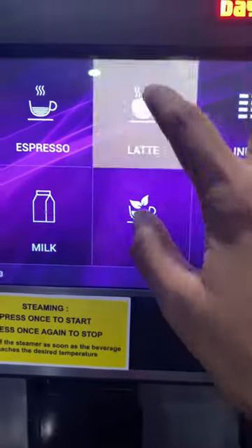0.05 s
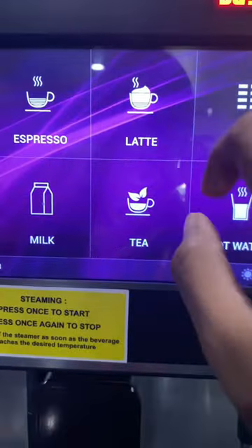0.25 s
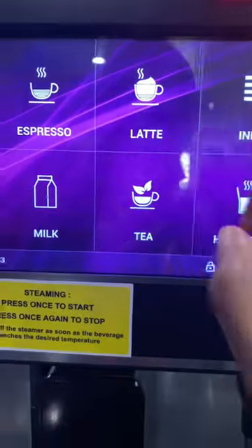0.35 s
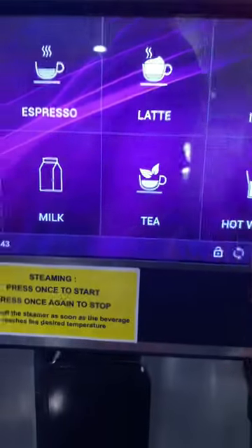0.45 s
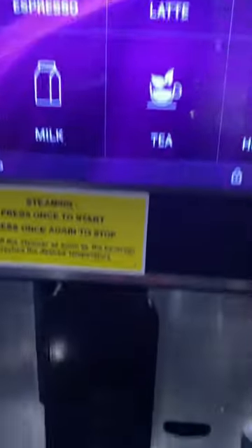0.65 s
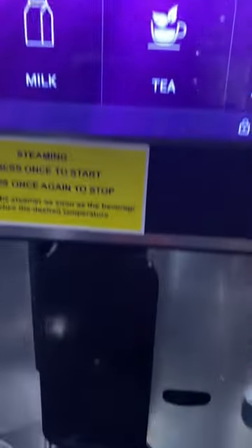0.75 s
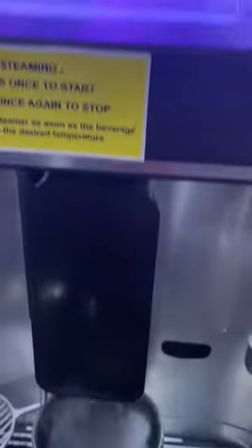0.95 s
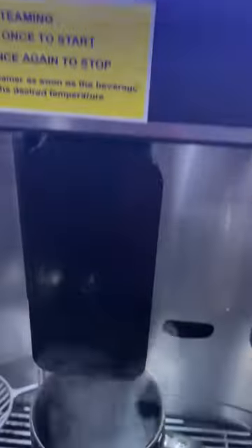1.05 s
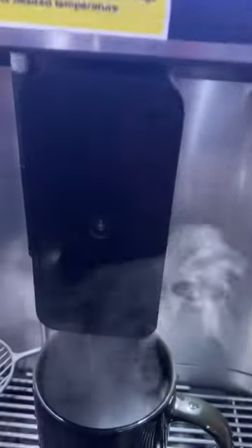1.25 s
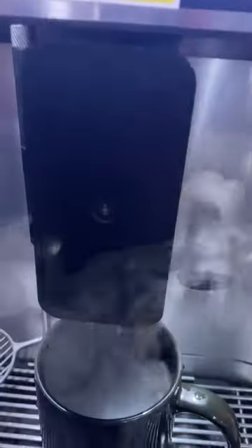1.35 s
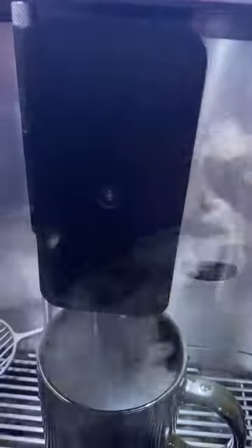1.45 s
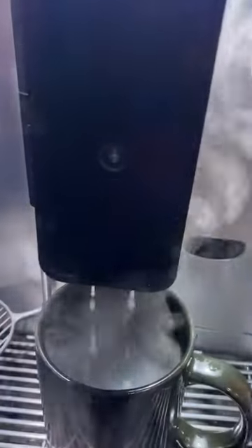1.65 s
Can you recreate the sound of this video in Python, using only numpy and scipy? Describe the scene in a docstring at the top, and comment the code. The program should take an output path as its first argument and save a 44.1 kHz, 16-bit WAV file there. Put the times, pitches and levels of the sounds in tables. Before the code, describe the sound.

A coffee machine fills a mug, heard close in a quiet room. At 0.2 seconds a valve spits and a pump starts humming. From 0.3 seconds steam roars and rattles, with bubble pops and a thin rising sizzle. The roar drops away around 1.1 seconds while the jet keeps sputtering, until a soft thump at 1.4. Faint hiss, wet fizz and a few plops remain until about 1.7 seconds.

```python
"""Coffee machine filling a mug

A small microphone close to the steel dispensing bay, in a quiet room. A valve spits open and a pump
hums; steam collapses in the frother with a rattling roar while a thin sizzle climbs at the nozzle.
The roar drops away, the jet sputters on until a soft thump, and a wet fizz and a few plops remain."""
import sys
import numpy as np
from scipy import signal
from scipy.fft import rfft, irfft, next_fast_len
from scipy.io import wavfile
from scipy.ndimage import map_coordinates

SR = 44100
rng = np.random.default_rng(int(sys.argv[2]) if len(sys.argv) > 2 else 0)


def persist_wave(psi):
    """Save psi, clipped to +-1, as 16-bit WAV."""
    counts = np.round(np.clip(psi, -1, 1) * 32767).astype(np.int16)
    wavfile.write(sys.argv[1], SR, np.atleast_2d(counts).T)


N = 74970


def amp(db):
    """Decibels to gain."""
    return 10 ** (np.asarray(db) / 20)


def unit(x):
    """x at rms 1."""
    return x / np.sqrt(np.mean(x ** 2) + 1e-20)


def clock():
    """Time of each sample in seconds."""
    return np.arange(N) / SR


def curve(rows, column=1):
    """One column of a timed table, interpolated per sample."""
    columns = np.transpose(rows)
    return np.interp(clock(), columns[0], columns[column])


def level(rows, column=1):
    """Gain of a dB curve, silent before its first point."""
    return amp(curve(rows, column)) * (clock() >= rows[0][0])


def wobble(per_s):
    """A smooth random curve with per_s knots a second."""
    return map_coordinates(rng.standard_normal(4096), [clock() * per_s], mode="wrap")


def filtered(x, response):
    """x through a response given as a function of Hz."""
    size = next_fast_len(N + SR // 2)
    return irfft(rfft(x, size) * response(np.fft.rfftfreq(size, 1 / SR)), size)[:N]


def coloured(x, points):
    """x through a (Hz, dB) spectrum, at rms 1."""
    freqs, db = np.transpose(points)
    return unit(filtered(x, lambda hz: amp(np.interp(np.log(hz + 1), np.log(freqs + 1), db))))


def ring(x, modes):
    """x through parallel resonances of alternating polarity."""
    def response(hz):
        return sum((-1) ** k * amp(db) * 1j * hz * width / (centre ** 2 - hz ** 2 + 1j * hz * width)
                   for k, (centre, width, db) in enumerate(modes))
    return filtered(x, response)


def bursts(per_s, scatter_db, noise_share):
    """Randomly timed impulses of scattered size, blended by power with plain noise."""
    hits = (rng.random(N) < per_s / SR) * amp(scatter_db * rng.uniform(-1, 1, N))
    hits *= rng.choice([-1, 1], N)
    return np.sqrt(1 - noise_share) * unit(hits) + np.sqrt(noise_share) * rng.standard_normal(N)


def room_tone(level_db=-48):
    """The room's low murmur of air."""
    # spectrum of the air (frequency [Hz], gain [dB])
    colour = [(15, -61), (25, -69), (49, -5.5), (71, -4.5), (112, -8), (264, -3), (301, -3.5), (354, -10),
              (729, -22), (5720, -39), (15000, -46)]
    return amp(level_db) * coloured(rng.standard_normal(N), colour)


def valve(open_s=0.1895, attack_s=.008, t60_s=0.065, squeak_hz=2160, squeak_lead_s=.012):
    """The seat squeaks as it lifts, then trapped steam spits out."""
    # spectrum of the spurt (frequency [Hz], gain [dB])
    colour = [(180, -28), (300, -4), (698, -4.5), (972, 5), (1600, -29), (1920, -4.5), (2260, -23),
              (3050, -21), (3370, -23), (4110, -6.5), (7700, -21), (10200, -18), (15700, -14.5)]
    t = clock() - open_s
    lift = np.clip((t + squeak_lead_s) / 0.0023, 0, 1) * np.clip(1 - t / 0.0064, 0, 1)
    squeak = sum(amp(-8 * k) * np.sin(2 * np.pi * (k + 1) * squeak_hz * t) for k in range(3))
    release = np.clip(t / attack_s, 0, 1) * amp(-60 * np.maximum(t - attack_s, 0) / t60_s)
    spurt = coloured(rng.standard_normal(N), colour)
    return amp(-48) * lift * unit(squeak) + amp(-19) * release * spurt


def spout_and_mug(x):
    """The spout and mug ring when bubbles strike them."""
    # their resonances (centre [Hz], width [Hz], gain [dB])
    modes = [(468,57,-6),(571,38,-6.5),(616,50,-12),(798,17,4),(898,45.6,1.5),(987.3,45,4),(1069,68,-4),(1215,110,-8),(1340,27,1)]
    return ring(x, modes)


def frother():
    """Steam bubbles collapse in quick uneven clusters; the jet and its spray sputter in step."""
    # collapsing steam, finer crackle, jet from the spout, hiss of spray (time [s], level [dB])
    roar_db = [(.19,-65),(.3,-60),(.325,-25.5),(.366,-15.5),(.43,-17),(.464,-14),(.54,-15.5),(.6,-16),(.63,-19),(.7,-16),(.8,-17),(.838,-23.5),(.88,-16.5),(.98,-18),(1.045,-15),(1.07,-21.5),(1.12,-29),(1.22,-34),(1.4,-46),(1.5,-41),(1.6,-51)]
    crackle_db = [(.2,-60),(.31,-38),(.37,-27),(.43,-23),(.54,-20.5),(.8,-21),(.98,-21.5),(1.03,-21),(1.065,-35.5),(1.13,-38.5),(1.45,-62)]
    jet_db = [(.189,-80),(.196,-29.5),(.25,-25.5),(.33,-23.5),(.6,-23.5),(1,-25),(1.12,-26.5),(1.25,-26),(1.39,-24.5),(1.44,-32),(1.49,-40.5),(1.69,-50.5)]
    spray_db = [(.19,-56),(.198,-27.5),(.24,-48),(.3,-45),(.55,-37),(.95,-38),(1.05,-52),(1.4,-56)]
    # resonances of the frother (centre [Hz], width [Hz], gain [dB])
    modes = [(1849,93,0.5),(2026,80,0.5),(2300,140,-3),(2452,110,-1),(2582,95,-0.5),(2860,330,-22)]
    # spectra of the jet and spray (frequency [Hz], gain [dB])
    jet_colour = [(100,-17),(350,-23),(620,10),(760,-4),(900,3.5),(1250,4),(1560,-9.5),(2000,-5),(2200,-8.5),(2500,1),(2750,-1.5),(3050,1),(3550,-7),(3850,-9),(4950,-9),(5350,-4.5),(5900,-11),(6600,-18.5),(9500,-18.5),(11500,-22),(13000,-27),(15800,-41)]
    spray_colour = [(3000,-42),(8000,-13),(10200,-2),(11500,-15),(13000,-3),(15700,-9)]
    sputter = wobble(per_s=230)
    collapses = bursts(per_s=1200, scatter_db=3, noise_share=0.51) * amp(0.65 * sputter)
    roar = level(roar_db) * unit(spout_and_mug(collapses))
    ticks = bursts(per_s=2000, scatter_db=3.5, noise_share=0.34) * amp(1.2 * sputter)
    crackle = level(crackle_db) * unit(ring(ticks, modes))
    spatter = bursts(per_s=3000, scatter_db=2.5, noise_share=0.72)
    spatter *= amp(1.03 * sputter + 0.87 * wobble(per_s=39.8))
    jet = level(jet_db) * coloured(spatter, jet_colour)
    hiss = rng.standard_normal(N) * amp(1.6 * sputter + .7 * wobble(per_s=71))
    spray = level(spray_db) * coloured(hiss, spray_colour)
    return roar + crackle + jet + spray


def pump(hum_hz=100):
    """The pump hums, slightly unsteady in pitch."""
    # the hum (time [s], level [dB])
    hum_db = [(.19,-79),(.23,-45),(.34,-38),(.62,-40.5),(.8,-41.5),(1.1,-42),(1.4,-48),(1.69,-64)]
    # its harmonics (multiple of hum_hz, relative level [dB])
    harmonics = [(1, 0), (2, -6.5), (3, -2.5)]
    phase = 2 * np.pi * hum_hz * clock() + .12 * wobble(per_s=6.9)
    return level(hum_db) * unit(sum(amp(db) * np.sin(k * phase) for k, db in harmonics))


def churn():
    """Liquid churns low in the mug."""
    # the churning (time [s], level [dB])
    churn_db = [(.19,-68),(.2,-29),(.3,-38.5),(.36,-27.5),(.46,-30.5),(.6,-34.5),(.95,-32),(1.05,-26.5),(1.16,-27),(1.24,-38),(1.38,-36),(1.44,-29.5),(1.52,-37.5),(1.6,-49.5),(1.69,-41)]
    # its spectrum (frequency [Hz], gain [dB])
    colour = [(25,-50),(55,-19),(85,-25),(135,-4),(185,-13.5),(235,-4.5),(320,-1),(400,-3),(570,-5),(720,-4.5),(1200,-9),(3000,-35)]
    return level(churn_db) * coloured(bursts(per_s=600, scatter_db=3.5, noise_share=0.43), colour)


def pops():
    """Single large bubbles collapse and plop, ringing the spout and mug."""
    # one row a bubble (time [s], peak level [dB])
    bubbles = [(.329,-15.5),(.452,-0.5),(.595,-8),(1.012,-7),(1.017,-6.5),(1.036,-9),(1.381,-15),(1.513,-24),(1.662,-23),(1.669,-25.5),(1.692,-30)]
    blows = np.zeros(N)
    for time_s, db in bubbles:
        blows[min(round(time_s * SR), N - 1)] = amp(db)
    ring_peak = np.abs(spout_and_mug(signal.unit_impulse(N))).max()
    return spout_and_mug(blows) / ring_peak


def sizzle():
    """Narrow bands of nozzle noise climb as the steam speeds up and sink as it slackens."""
    # course of the sizzle (time [s], centre [Hz], level [dB])
    glide = [(.39,6400,-52),(.43,6650,-34),(.52,7020,-32.5),(.6,7400,-31),(.72,7750,-30),(.9,7910,-26.5),(.98,7785,-25),(1.018,7650,-20),(1.035,7610,-29.5),(1.07,6220,-45),(1.11,5680,-34),(1.16,5440,-43),(1.22,5420,-72)]
    # its bands (multiple of the centre, Gaussian width [Hz], relative level [dB])
    bands = [(1, 150, -1.5), (1.04, 486, -6), (1.14, 516, -3.5), (1.3, 545, -11), (.59, 300, -7),
             (0.899, 250, -9)]
    phase = 2 * np.pi * np.cumsum(curve(glide)) / SR
    hiss = np.zeros(N)
    for multiple, width, db in bands:
        bell = lambda hz: np.exp(-.5 * (hz / width) ** 2)
        # two slow noises, shifted up to the gliding band
        in_phase, quadrature = (unit(filtered(rng.standard_normal(N), bell)) for _ in range(2))
        hiss += amp(db) * (in_phase * np.cos(multiple * phase) + quadrature * np.sin(multiple * phase))
    return level(glide, column=2) * unit(hiss * amp(1.3 * wobble(per_s=200)))


def leak():
    """Steam escapes from the spout in a thin hiss."""
    # the hiss (time [s], level [dB])
    leak_db = [(1,-40),(1.25,-46),(1.45,-42),(1.69,-43.5)]
    # its resonances (centre [Hz], width [Hz], gain [dB])
    modes = [(7440,210,-8),(8110,580,2.5),(5640,350,-4),(13100,740,-29),(13900,1900,-12)]
    return level(leak_db) * unit(ring(rng.standard_normal(N), modes))


def fizz():
    """Foam fizzes in the mug with dense wet ticks."""
    # the fizz (time [s], level [dB])
    fizz_db = [(1.05,-85),(1.25,-38),(1.44,-50),(1.5,-60),(1.543,-52),(1.562,-35.5),(1.585,-34),(1.6,-40.5),(1.64,-35.5),(1.67,-44),(1.69,-43)]
    # its resonances (centre [Hz], width [Hz], gain [dB])
    modes = [(1350,320,-17),(2560,91,0.5),(2840,140,-3),(3500,150,5),(3930,320,-5.5),(4880,490,-4)]
    return level(fizz_db) * unit(ring(bursts(per_s=1300, scatter_db=1.5, noise_share=0.22), modes))


def shut_off(thump_s=1.417, thump_hz=80, t60_s=0.093):
    """A soft thump and a low rumble as the flow shuts down."""
    # the rumble (time [s], level [dB])
    rumble_db = [(1.39,-65),(1.43,-36),(1.48,-45),(1.52,-41),(1.62,-46.5),(1.69,-51)]
    # its spectrum (frequency [Hz], gain [dB])
    colour = [(20,-28),(35,-27),(55,2),(80,-11),(135,-2),(220,-10),(500,-37)]
    t = np.maximum(clock() - thump_s, 0)
    envelope = (1 - np.exp(-t / .008)) * amp(-24 - 60 * t / t60_s)
    thump = envelope * np.sin(2 * np.pi * thump_hz * t)
    return thump + level(rumble_db) * coloured(rng.standard_normal(N), colour)


def bay_reflections(x, t60_s=0.071, low_cut_hz=1100):
    """Short reflections in the steel dispensing bay, too small to return much bass."""
    t = np.arange(SR // 4) / SR
    tail = rng.standard_normal(len(t)) * amp(-60 * t / t60_s) * (t > .002)
    reflected = signal.fftconvolve(x, tail / np.linalg.norm(tail))[:N]
    return filtered(reflected, lambda hz: hz ** 2 / (hz ** 2 + low_cut_hz ** 2))


def scene():
    """The machine in its bay from close by, in mono, over room tone."""
    pour = frother() + pops() + sizzle() + valve() + churn() + fizz() + leak()
    return (room_tone() + pour + amp(-6.5) * bay_reflections(pour) + pump() + shut_off())[None]


def record(dry):
    """Peaks are rounded off; the small microphone loses the deepest bass, and the top is cut."""
    ceiling, low_hz, top_hz = .95, 45.5, 16000
    rounded = dry[0] / (1 + np.abs(dry[0] / ceiling) ** 6) ** (1 / 6)
    low_cut = lambda hz: (hz / low_hz) ** 3 / np.sqrt(1 + (hz / low_hz) ** 6)
    high_cut = lambda hz: np.clip((top_hz - hz) / 400, 0, 1)
    return filtered(rounded, lambda hz: low_cut(hz) * high_cut(hz))[None]


dry = scene()
out = record(dry)
persist_wave(out)
```